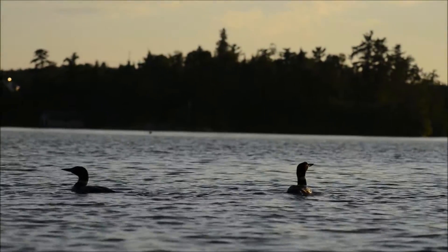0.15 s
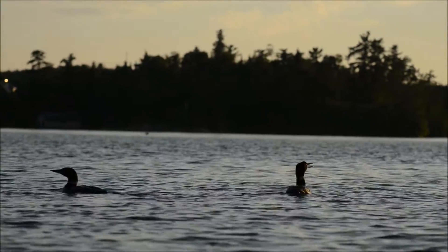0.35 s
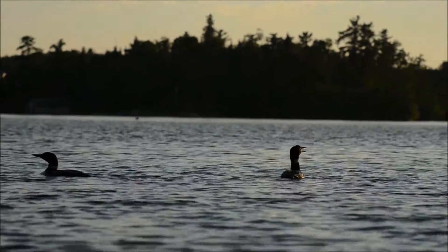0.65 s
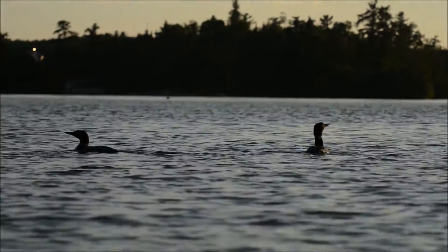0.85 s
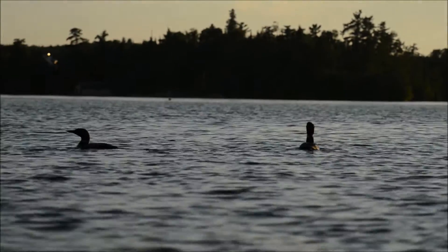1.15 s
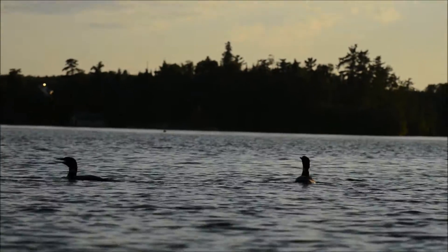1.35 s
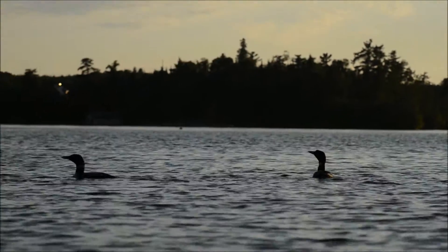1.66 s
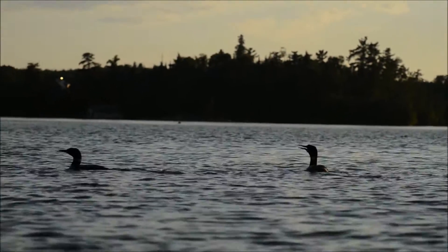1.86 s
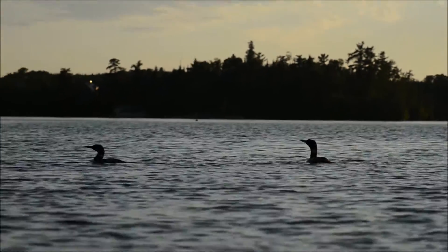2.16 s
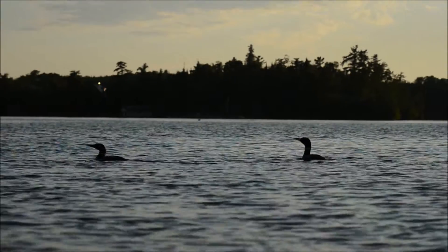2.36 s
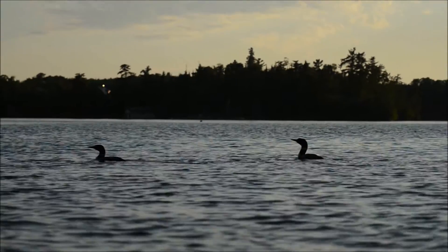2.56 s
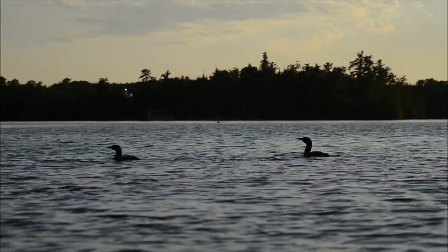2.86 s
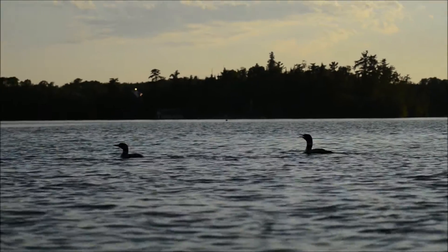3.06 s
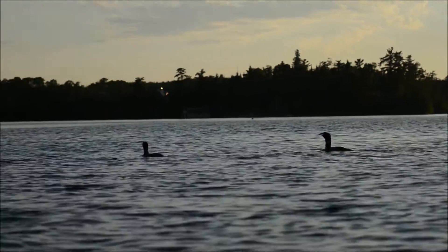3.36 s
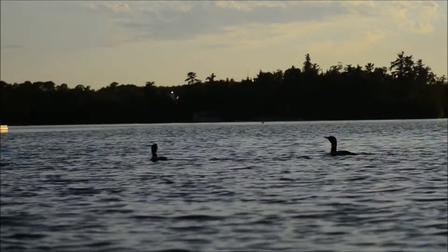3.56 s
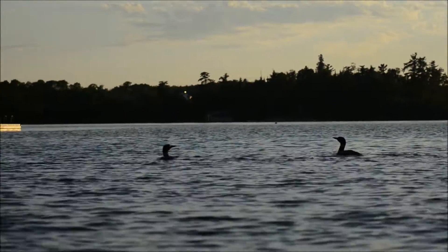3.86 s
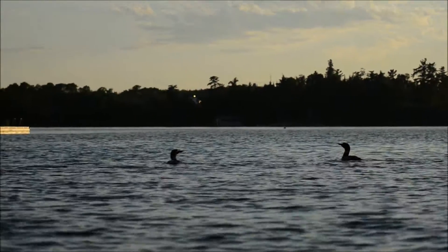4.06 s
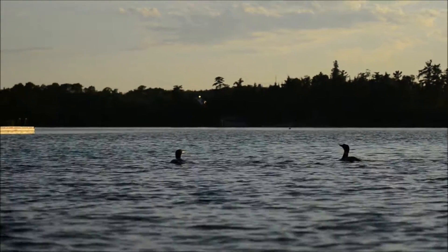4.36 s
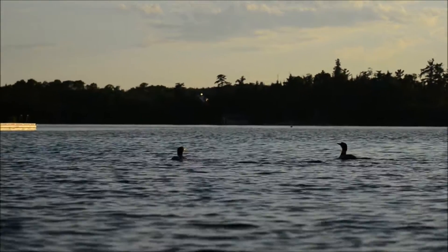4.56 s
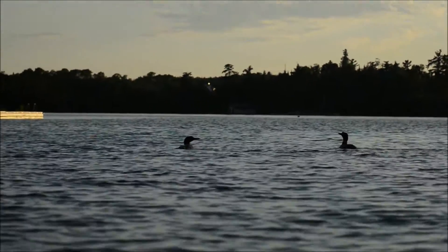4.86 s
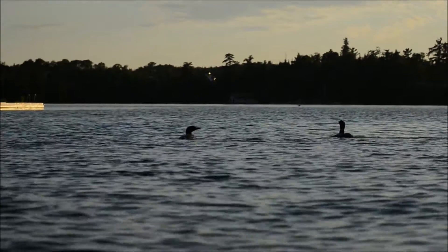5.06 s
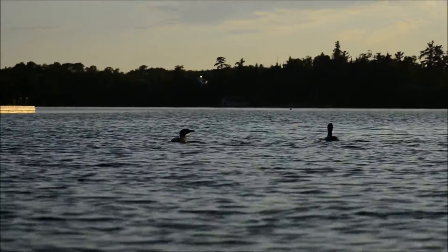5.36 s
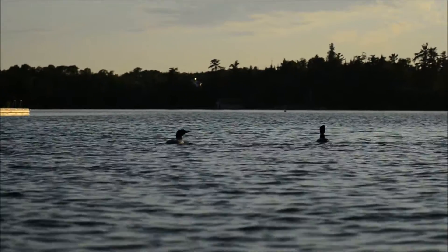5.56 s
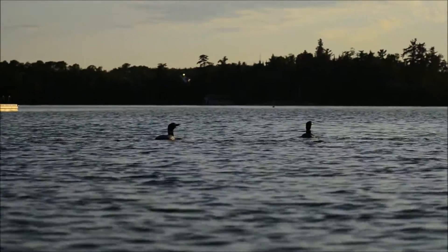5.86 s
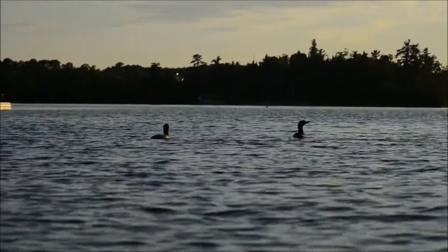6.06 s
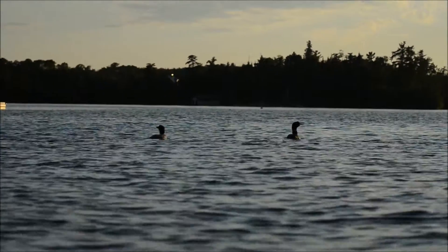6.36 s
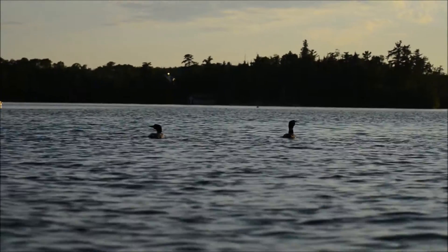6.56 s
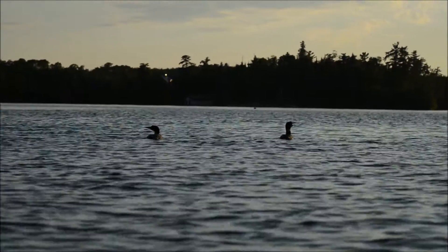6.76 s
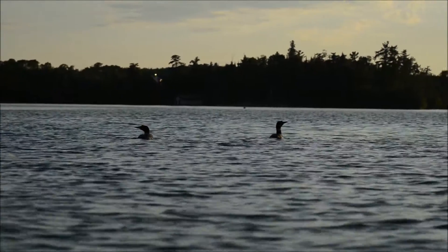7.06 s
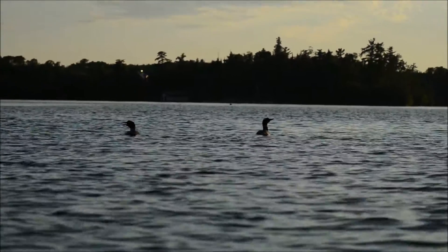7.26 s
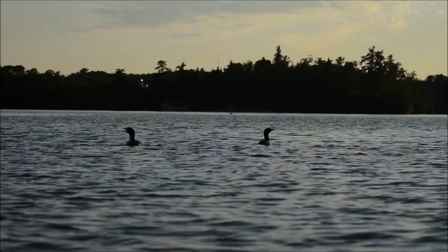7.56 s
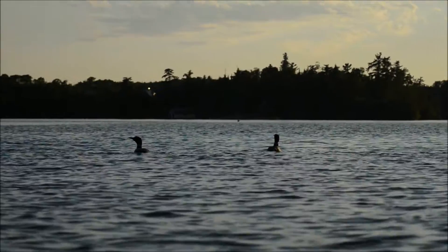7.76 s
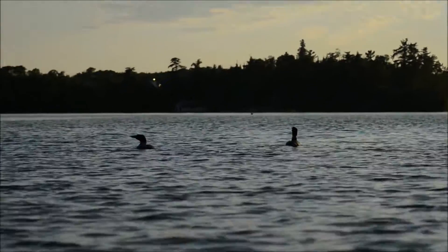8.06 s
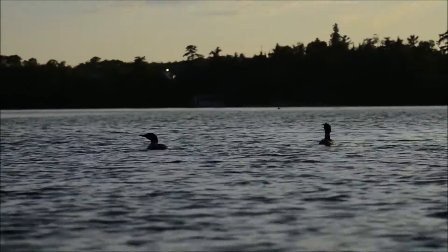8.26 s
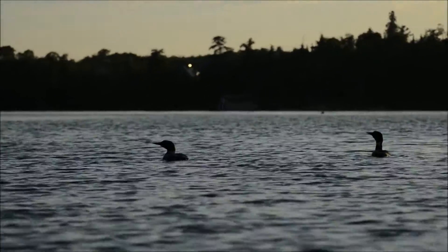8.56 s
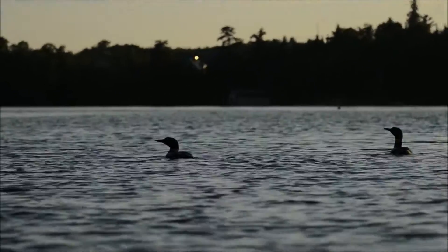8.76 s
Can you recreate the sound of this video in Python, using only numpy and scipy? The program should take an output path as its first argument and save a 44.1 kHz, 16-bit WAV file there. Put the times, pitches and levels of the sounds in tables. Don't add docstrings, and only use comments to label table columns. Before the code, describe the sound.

Outdoors on a lake, two loons exchange loud tremolo calls, throbbing about ten times a second and breaking abruptly between registers. A low-to-middle laugh comes at 0.3-1.0 seconds, another at 1.3-1.8, overlapped by the second bird's higher, three-step yodelling tremolo until 2.4. That bird calls again at 3.1-3.7, over a fainter laugh from 3.4. After a pause with a tiny insect trill around 4, two laughs run nearly together from 4.9 to 6.1. A lone high tremolo follows at 6.45-7.1, a laugh at 7.3-7.8, and a last high tremolo at 8.1-8.7. Diffuse echoes wash back from the trees. Low wind thumps hit the hand-held microphone, densest around 2.4-3.2 and 4.1-5.7. Small handling ticks fall near 1 and 3, the sharpest at 4.8; a faint rub passes around 8. Soft hiss and very faint high whine persist.

```python
import sys
import numpy as np
from scipy import signal
from scipy.fft import rfft, irfft, next_fast_len
from scipy.io import wavfile
from scipy.ndimage import uniform_filter1d, map_coordinates

SR = 44100
rng = np.random.default_rng(int(sys.argv[2]) if len(sys.argv) > 2 else 0)


def makeup_ratio(level_db):
    decades = np.asarray(level_db, float) / 20
    return 10 ** decades


def transcribe(signal):
    frames = np.atleast_2d(signal).T
    limited = np.clip(frames, -1, 1)
    pcm = np.round(limited * 32767).astype(np.int16)
    wavfile.write(sys.argv[1], SR, pcm)


N = 393372


def unit(x):
    return x / np.sqrt(np.mean(x ** 2) + 1e-20)


def along(points, hz):
    f, v = np.transpose(points)
    return np.interp(np.log(hz + 1), np.log(f + 1), v)


def wobble(rate):
    return map_coordinates(rng.standard_normal(int(N * rate / SR) + 4), [np.arange(N) * rate / SR])


def filtered(x, response):
    m = next_fast_len(len(x) + 8192)
    return irfft(rfft(x, m) * response(np.fft.rfftfreq(m, 1 / SR)), m)[:len(x)]


def noise(spectrum):
    return unit(filtered(rng.standard_normal(N), lambda hz: makeup_ratio(along(spectrum, hz))))


def bell(hz, centre_hz, octaves):
    return np.exp(-.5 * (np.log2((hz + 1) / centre_hz) / octaves) ** 2)


def add(track, s, sound):
    part = track[round(s * SR):][:len(sound)]
    part += sound[:len(part)]


# frequency in Hz, level in dB.
THROAT = [(400, -10), (750, 2.5), (1200, -1.5), (1550, 6.5), (1900, -10), (2350, -7), (2900, -30),
          (3250, -7), (3800, -10.5), (4700, -11), (5400, -21.5), (6100, -38.5), (6800, -24.5),
          (11000, -35.5)]


def partial_levels(k, pitch, effort_db, straining, glint, colour):
    second_db, third_db, bill_db = colour
    hz = k * pitch
    source_db = -7 * (k - 1) ** 0.77
    source_db = source_db + (second_db + 0.35 * effort_db) * (k == 2) + third_db * (k == 3)
    push_db = effort_db * np.where(hz < 5200, 1.1, -.2)
    source_db = source_db + (push_db - 4 * straining) * (hz > 2800)
    source_db = source_db + 5.5 * glint * np.clip(hz / 1500 - 1.5, 0, 1)
    throat_db = along(THROAT, hz) - along(THROAT, pitch)
    return source_db + throat_db + bill_db * np.clip(hz / 1300 - 2.1, 0, 2.2)


THIRD_LINES = {(3, "middle"): -32, (7, "middle"): -44.5, (8, "middle"): -38.5, (9, "middle"): -30.5}
TIRING = {(4, "middle"): 1.1, (2, "middle"): 0.8}
CRACK_S = {(1, "low"): 0.061, (2, "low"): 0.035, (5, "low"): 0.073}


def loons():
    voice, flutter, shimmer, rasp = np.zeros(N), wobble(90), wobble(120), wobble(350)
    glint = np.minimum([wobble(60) for _ in range(12)], 1.1)
    k = np.arange(1, 13)[:, None]
    for index, i, hz, push, colour in notes():
        t = i / SR
        to_break = 1 - (t[-1] - t) / CRACK_S.get(index, 0.022)
        straining = (hz[0] < 850 < hz[-1]) * np.clip(to_break, 0, 1)
        opening = (850 > hz[0] > 660) * np.exp(-(t - t[0]) / 0.0077)
        pitch = hz * (1 + 0.0017 * flutter[i])
        pitch *= 1 + .012 * np.sqrt(straining) * rasp[i]
        pitch *= 1 - 0.076 * opening
        phase = 2 * np.pi * np.cumsum(pitch) / SR
        gain = push * makeup_ratio(.5 * shimmer[i]) * (1 - .9 * opening)
        effort_db = 20 * np.log10(gain / gain.max() + 1e-6)

        progress = (t - t[0]) / (t[-1] - t[0])
        uneven = 1 + TIRING.get(index, 0) * progress ** 4 * np.cos(phase / 3) * (k > 1)
        alternating = np.cos(phase / 2 + 4.1 * flutter[i])
        uneven = uneven + 0.61 * np.sqrt(straining) * alternating * (k > 1)

        levels_db = partial_levels(k, pitch, effort_db, straining, glint[:, i], colour)
        partials = np.sin(k * phase + rng.uniform(0, 2 * np.pi, k.shape))
        wave = np.sum(uneven * makeup_ratio(levels_db) * partials, 0)
        thirds = sum(np.sin(phase * third / 3) for third in (2, 4, 5))
        wave += makeup_ratio(THIRD_LINES.get(index, -120) + .8 * effort_db) * thirds
        edge = np.clip(np.minimum(t - t[0], t[-1] - t) / 0.006, 0, 1)
        voice[i] += np.sqrt(2) * gain * edge * wave
    return voice


# second partial in dB, third partial in dB, bill in dB.
SCOOP_COLOUR = (8.5, -2.5, -2)
SCOOPS_S = [0.015, 0.025, 0.058, 0.049, 0.0076, 0.018, 0.018, 0.022, 0.019, 0.016]


def scoop(index, call, overlap_s):
    s, crest_hz, _, _, db = next(iter(call.values()))
    i = np.arange(round((s - SCOOPS_S[index]) * SR), round((s + overlap_s) * SR))
    x = np.linspace(0, 1, len(i))
    pitch = crest_hz * (0.6 + (0.8 - 0.6) * x)
    gain = makeup_ratio(db - 20 * (1 - x) - 14.5 * x)
    return None, i, pitch, gain, SCOOP_COLOUR


def blend(low, high, u, power):
    return (low ** power + (high ** power - low ** power) * u) ** (1 / power)


# start in seconds, crest pitch in Hz,
# dip pitch in Hz, drift in Hz, crest level in dB.
LAUGHS = [
    {"low": (0.325, 749.5, 658, 149.5, -20.5), "middle": (0.466, 1231, 971, -230, -11), "close": (0.92, 679.5, 677.5, -58.5, -24.5)},
    {"low": (1.31, 773.5, 659, 240.5, -20), "middle": (1.428, 1279.5, 920, -380, -11), "close": (1.758, 682, 684, -28.5, -27)},
    {"low": (3.4, 808.5, 619, 208.5, -25.5), "middle": (3.538, 1199, 896, -100, -20.5), "coda": (3.698, 801.5, 671, -24.5, -24.5)},
    {"catch": (4.925, 720.5, 639, -24, -25.5), "low": (4.968, 797, 641.5, 150, -19.5), "middle": (5.126, 1323, 997.5, -180, -10.5), "coda": (5.487, 765, 702.5, -38.5, -20.5)},
    {"catch": (5.584, 784, 703.5, -17.5, -21), "low": (5.63, 852, 661, 100, -21), "middle": (5.754, 1295, 921, -300, -13), "close": (6.035, 664, 663.5, -49, -30)},
    {"low": (7.335, 792.5, 663, 228.5, -21), "middle": (7.436, 1288, 932.5, -340, -10.5), "close": (7.793, 653.5, 655.5, -26.5, -30)},
]
YODELS = [
    {"low": (1.695, 730.5, 640, 178.5, -23), "middle": (1.781, 1247, 1001.5, 65, -10), "high": (1.941, 1515, 1314.5, -170, -11), "step": (2.31, 1061.5, 1006.5, 29, -21), "close": (2.327, 708, 710, -100, -28)},
    {"low": (3.1, 720, 650, 192.5, -19.5), "middle": (3.181, 1268.5, 983, 42.5, -8.5), "high": (3.341, 1534, 1326, -190, -11.5), "step": (3.691, 1065, 1013, 28, -17.5)},
    {"low": (6.445, 757, 690.5, 186.5, -19.5), "middle": (6.536, 1299, 1005.5, 41, -9.5), "high": (6.721, 1534.5, 1313.5, -130, -11.5), "step": (6.972, 1019, 986.5, -37, -21), "close": (7.078, 697, 698, -79, -27.5)},
    {"low": (8.065, 787, 697.5, 84, -19), "middle": (8.154, 1294, 1029.5, 59.5, -9), "high": (8.326, 1522.5, 1339, -100, -11), "step": (8.608, 1077, 1016.5, -31.5, -19), "close": (8.715, 684.5, 693, -63, -36)},
]
# first dip in seconds, throb period in seconds,
# end in seconds, bill in dB, third partial in dB.
BREATHS = [(0.388, 0.099, 0.99, -8.5, -2.5), (1.358, 0.093, 1.81, 5, -1), (3.387, 0.09, 3.85, -3, -5.5),
           (4.966, 0.096, 5.58, -6.5, 0.5), (5.627, 0.095, 6.095, 2.7, -1), (7.379, 0.094, 7.84, 3.5, -0.5),
           (1.741, 0.093, 2.39, -2.5, 0.5), (3.126, 0.093, 3.715, -2.5, -0.5),
           (6.489, 0.0947, 7.115, -2, 2), (8.124, 0.092, 8.74, -11, 0.5)]
TURNS_DB = [-5, -3.5, 3.5, 0.5, -3, 0.5, 1.5, 3, -1.5, 11]
# second partial in dB, third partial in dB,
# partials over the bill's corner in dB, kick at the jump in dB.
TONE = [
    {"catch": (5, 1.9, 4.4, 0.3), "low": (7.2, 3.2, 8.8, 0.3), "middle": (-7.5, -5.5, 0.75, 1.5), "close": (2.5, -8, -0.8, -3), "coda": (2.5, 3.3, 11, 0.3)},
    {"low": (7.9, 8.2, 8.7, 0.3), "middle": (-3.5, -6.5, 1.7, 0), "high": (-3, -2, 2, 0.5), "step": (-7, -12.5, -1.5, -1.5), "close": (3.5, -6, -4.7, 5.2)},
]
LAUGH_RUN = {"catch": (0.5, -0.1, 6.5, -8, -2), "low": (3, 1.5, 8.5, 2.5, -1),
             "middle": (3.5, 0.22, 10.5, -9.5, -9.5), "close": (1.5, 2.5, 1.5, -16.5, -11.5),
             "coda": (1.9, 2, 3.5, -5, -18)}
YODEL_RUN = {"low": (2.5, 1.1, 7.2, 2.1, 1.8), "middle": (1.5, 1.46, 8.5, -2.9, -4.5),
             "high": (2.5, 0.43, 12.5, -6, -10), "step": (2, 1, 3.5, 3, -12),
             "close": (1.3, 1.3, 1.3, -16.5, -23.5)}
# throbs lost by the end, time constant in seconds, later lean of the crests.
FATIGUE = [(0.3, 0.12, 0.4), (0.3, 0.13, 0.15)]
ROUNDNESS = (1.8, 1.5)


def notes():
    overlap_s, kick_s = 0.004, 0.02
    ahead = 0.02
    for index, (call, breath) in enumerate(zip(LAUGHS + YODELS, BREATHS)):
        dip_s, period, end, breath_bill_db, breath_third_db = breath
        bird = int("high" in call)
        run, tone = (LAUGH_RUN, YODEL_RUN)[bird], TONE[bird]
        lag, lag_s, late = FATIGUE[bird]
        starts = [row[0] for row in call.values()]
        yield scoop(index, call, overlap_s)
        for (name, (s, crest, dip, drift, db)), to in zip(call.items(), starts[1:] + [end]):
            i = np.arange(round((s - overlap_s) * SR), round((to + overlap_s) * SR))
            t = i / SR
            power, share, depth_db, crests_db, dips_db = run[name]
            x = np.clip((t - s) / (to - s), 0, 1) ** power
            tired = np.exp(np.minimum(t - starts[-1], 0) / lag_s)
            throbs = (t - dip_s) / period - lag * tired
            lean = 1.12 + late * tired
            if name == "coda":
                throbs = np.minimum(throbs, np.round(throbs[0]) + .96)

            def push(lead):
                return np.abs(np.sin(np.pi * ((throbs + lead) % 1) ** lean)) ** ROUNDNESS[bird]

            pitch = blend(dip + share * drift * x, crest + drift * x, push(0), power=2.5)
            dip_gain, crest_gain = makeup_ratio(db - depth_db + dips_db * x), makeup_ratio(db + crests_db * x)
            gain = blend(dip_gain, crest_gain, push(ahead), power=0.98)
            second_db, third_db, bill_db, kick_db = tone[name]
            gain = gain * makeup_ratio(kick_db * np.exp(-np.abs(t - s) / kick_s))
            turn_db = TURNS_DB[index] * (t - starts[0]) / (end - starts[0])
            colour = second_db, third_db + breath_third_db, bill_db + breath_bill_db + turn_db
            yield (index, name), i, pitch, gain, colour


# delay in seconds, level in dB.
SHORE = [(0, -20.5), (.1, -27), (.3, -21.5), (0.599, -28), (1, -47), (1.601, -36.5)]
# frequency in Hz, level in dB.
TREES = [(500, -1.5), (1300, 4), (5000, -3.5), (10000, -32)]


def shore(voice):
    s, db = np.transpose(SHORE)
    t = np.arange(round(s[-1] * SR)) / SR
    out = np.zeros(N)
    hop = SR // 4
    for start in range(0, N, hop):
        piece = voice[start:start + 2 * hop]
        piece = piece * np.hanning(2 * hop)[:len(piece)]
        tail = rng.standard_normal(len(t)) * makeup_ratio(np.interp(t, s, db)) / np.sqrt(SR / 2)
        add(out, start / SR, signal.fftconvolve(piece, tail))
    fading = makeup_ratio(-41 - 14 * np.arange(N) / SR)
    earlier = fading * noise([(700, -47), (900, -7), (1200, -2), (1550, -9.5), (1800, -45)])
    return filtered(out, lambda hz: makeup_ratio(along(TREES, hz))) + earlier


# time in seconds, rumble level in dB.
BREEZE = [(0.0, -42), (0.32, -42), (0.45, -32.5), (0.62, -41), (0.82, -39.5), (1.12, -40), (2.11, -37),
          (2.63, -31), (2.98, -36.5), (3.43, -47.5), (4.12, -36), (4.3, -43.5), (5.71, -34), (5.81, -41),
          (7.43, -44), (8.02, -39), (8.42, -47.5), (8.92, -50.5)]
# frequency in Hz, density in dB per Hz.
RUMBLE = [(12, -45.5), (20, 7), (85, 10), (205, -0.5), (256, -7), (295, -8.5), (387, -14.5), (532, -24),
          (900, -33.5), (1170, -70), (1980, -120)]


def breeze():
    s, db = np.transpose(BREEZE)
    lumps = makeup_ratio(2 * wobble(10) + 6 * wobble(28))
    strength = makeup_ratio(np.interp(np.arange(N) / SR, s, db) + 11.0)
    return strength * unit(lumps * noise(RUMBLE))


# centre in seconds, peak level in dB, frequency in Hz, length in seconds.
THUMPS = [(0.047, -9, 145, 0.017), (0.388, -12.5, 134, 0.016), (1.258, -17, 127, 0.025),
          (1.827, -14.5, 108.5, 0.012), (2.036, -15.5, 212, 0.029), (2.078, -15, 125, 0.0087),
          (2.457, -8.5, 233, 0.026), (2.498, -10, 196, 0.029), (2.621, -12.5, 124, 0.01),
          (2.715, -8, 171, 0.027), (2.815, -9, 153, 0.015), (2.895, -14, 225, 0.0073),
          (2.967, -11, 185, 0.039), (3.076, -14, 109, 0.017), (3.159, -8, 193, 0.03),
          (3.925, -19, 157.5, 0.012), (4.12, -17.5, 160, 0.013), (4.182, -13, 163.2, 0.0049),
          (4.202, -7.5, 144, 0.016), (4.351, -15, 113, 0.011), (4.522, -16, 132, 0.025),
          (4.571, -19, 173, 0.012), (4.743, -7, 174, 0.026), (4.812, -18, 161.5, 0.037),
          (4.929, -9.5, 165, 0.015), (5.194, -11, 195, 0.024), (5.536, -12, 195, 0.024),
          (5.626, -11.5, 161, 0.0053), (5.719, -16, 127, 0.011), (7.528, -16.5, 193, 0.0067)]


def eddies():
    out, t = np.zeros(N), np.arange(-SR // 20, SR // 20) / SR
    for s, db, hz, length in THUMPS:
        shape = np.exp(-.5 * (t / (0.5 * length)) ** 2)
        sway = np.cos(2 * np.pi * hz * t + rng.uniform(0, 2 * np.pi))
        rough = filtered(rng.standard_normal(len(t)), lambda f: bell(f, 0.75 * hz, octaves=0.97))
        push = shape * (sway + 1.58 * unit(rough))
        start = s + t[0]
        skipped = max(round(-start * SR), 0)
        add(out, max(start, 0), makeup_ratio(db + 0.5) * push[skipped:] / np.abs(push).max())
    return out


# time in seconds, peak level in dB, rattle T60 in seconds, centre in Hz.
TICKS = [
    (0.838, -32, 0.07, 7130),
    (0.986, -29.5, 0.02, 2940),
    (2.979, -21.5, .02, 1790),
    (4.805, -18, 0.09, 2100),
    (2.96, -35, 0.018, 1500),
    (4.737, -40, .006, 2500),
    (4.804, -20.5, .006, 4500),
    (8.099, -44, 0.016, 7020),
]


def ticks():
    out, t = np.zeros(N), np.arange(SR // 8) / SR
    for s, db, t60, hz in TICKS:
        decay = makeup_ratio(-60 * t / 0.0073) + makeup_ratio(-60 * t / t60)
        crack = np.pad(rng.standard_normal(len(t)) * decay, (50, 0))
        crack = filtered(crack, lambda f: bell(f, hz, octaves=1.0))
        add(out, s - 50 / SR, makeup_ratio(db) * crack / np.abs(crack).max())
    return out


# start in seconds, end in seconds, level in dB.
RUBS = [
    (0.838, 1.01, -58),
    (7.899, 8.301, -53.5),
]


def rubs():
    out = np.zeros(N)
    rub = noise([(2500, -30.5), (5000, -4.0), (8000, 0), (11000, -6), (16000, -14.5)])
    for start, end, db in RUBS:
        i = np.arange(round(start * SR), round(end * SR))
        out[i] += makeup_ratio(db) * np.hanning(len(i)) ** 0.81 * (rub * makeup_ratio(3.7 * wobble(25)))[i]
    return out


# start in seconds, level in dB.
CHIRPS = [(3.91, -53), (4.03, -53), (4.155, -53), (4.279, -54), (4.404, -56)]


def insect():
    out, t = np.zeros(N), np.arange(round(0.032 * SR)) / SR
    for s, db in CHIRPS:
        warble = np.cos(2 * np.pi * 100 * t + rng.uniform(0, 2 * np.pi))
        hz = 3500 + 330 * warble - 5000 * t
        tone = np.sin(2 * np.pi * np.cumsum(hz) / SR)
        add(out, s, makeup_ratio(db + 2.2 * warble) * np.hanning(len(t)) ** 0.3 * tone)
    return out


# frequency in Hz, density in dB per Hz.
HISS = [(290, -36), (500, -11), (946, -8), (1230, 1), (1510, -11), (2010, -19.5), (3590, -19.5),
        (15100, -30), (16000, -46)]
# frequency in Hz, level in dB.
WHINE = [(7628, -78), (10163, -82.5)]


def camera():
    t = np.arange(N) / SR
    lines = sum(makeup_ratio(db + 2 * wobble(3)) * np.sin(2 * np.pi * hz * t) for hz, db in WHINE)
    return makeup_ratio(-49.5) * noise(HISS) + lines


def ducked(faint, voice):
    power = np.abs(uniform_filter1d(voice ** 2, SR // 8))
    return faint * (1 + power / makeup_ratio(-35.0)) ** -.22


GAPS = [(0.558), (0.62), (0.921), (1.369), (1.649), (1.732), (2.393), (2.458), (2.476), (2.608), (2.67),
        (2.713), (3.269), (4.675), (4.76), (4.867), (7.002), (7.299), (7.77), (7.897), (8.305), (8.344)]


def starved(faint):
    keep, dip = np.ones(N), np.hanning(round(.03 * SR)) ** 0.75
    for s in GAPS:
        add(keep, s - .015, -.95 * dip)
    treble = filtered(faint, lambda hz: np.clip((hz - 1700) / 200, 0, 1))
    return faint + (np.abs(keep) - 1) * treble


def scene():
    voice = loons()
    faint = shore(voice) + insect() + ducked(camera(), voice)
    wind = breeze() + eddies()
    grip = ticks() + rubs()
    return (voice + wind + grip + starved(faint))[None]


def top_cut(x):
    return signal.sosfilt(signal.butter(12, 16160, fs=SR, output="sos"), x)


def record(dry):
    sensed = filtered(dry[0], lambda hz: (1j * hz / (45 + 1j * hz)) ** 2)
    return top_cut(sensed[None])


dry = scene()
out = record(dry)
transcribe(out)
```